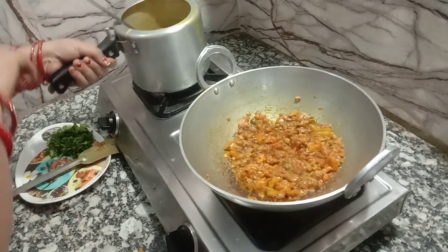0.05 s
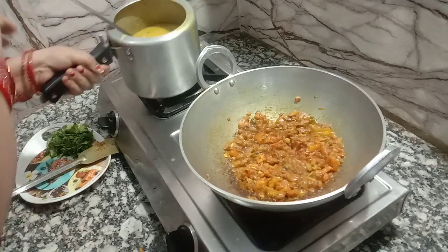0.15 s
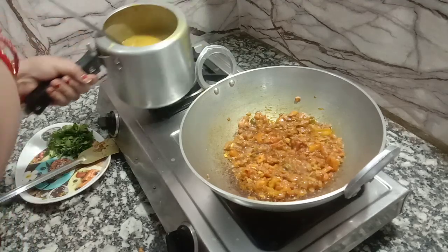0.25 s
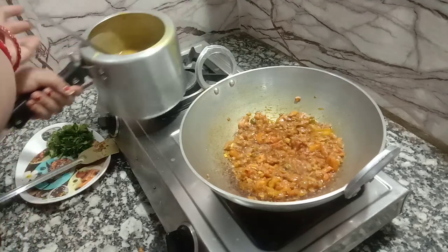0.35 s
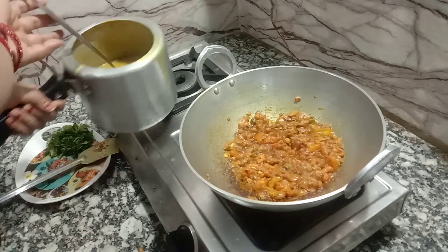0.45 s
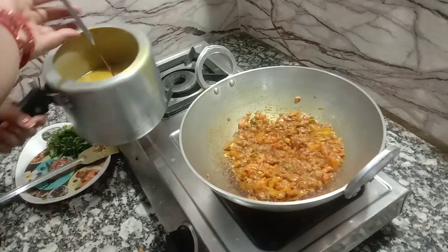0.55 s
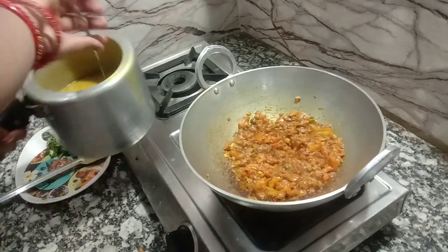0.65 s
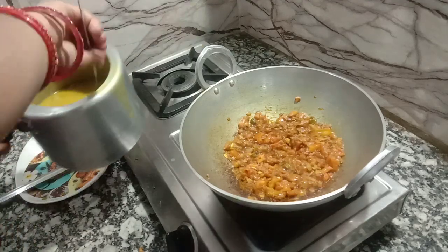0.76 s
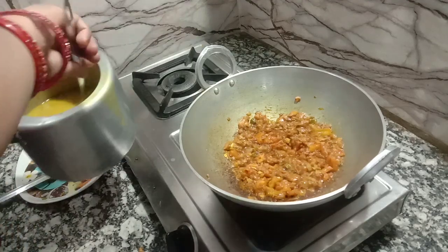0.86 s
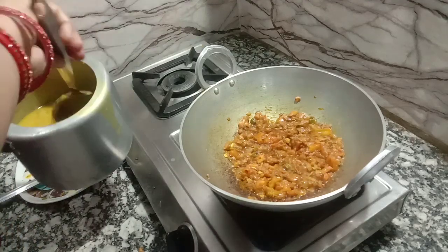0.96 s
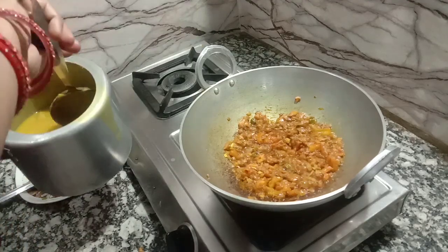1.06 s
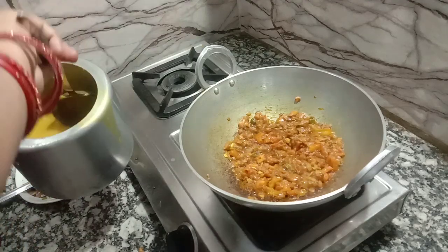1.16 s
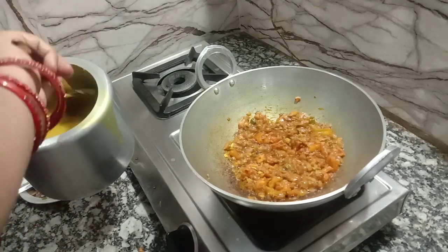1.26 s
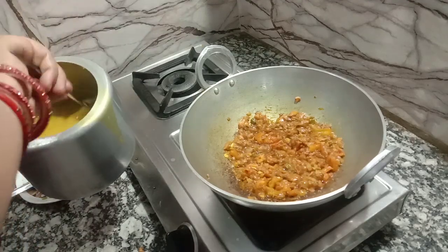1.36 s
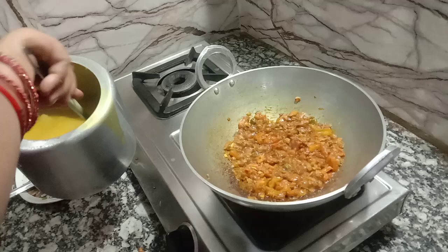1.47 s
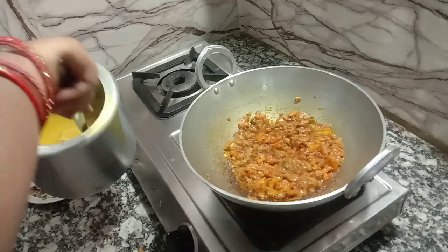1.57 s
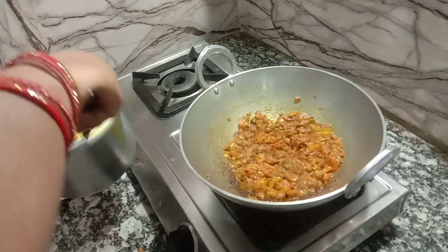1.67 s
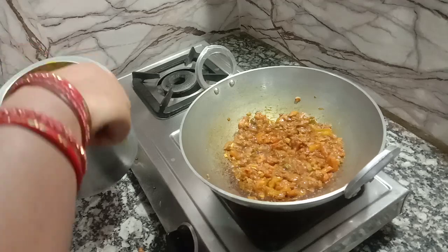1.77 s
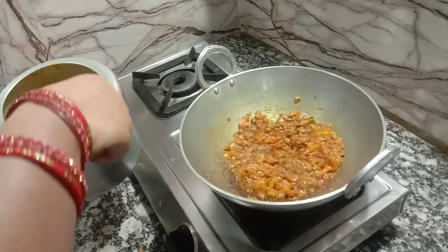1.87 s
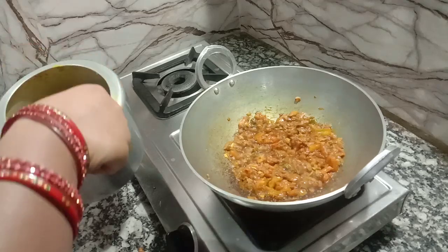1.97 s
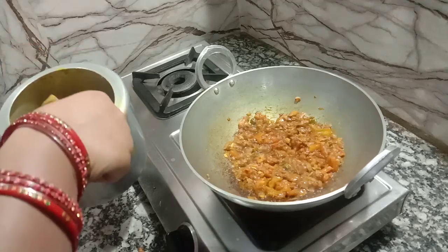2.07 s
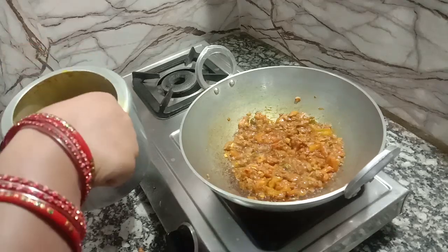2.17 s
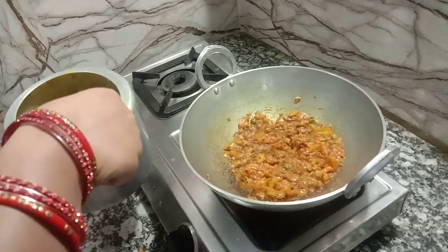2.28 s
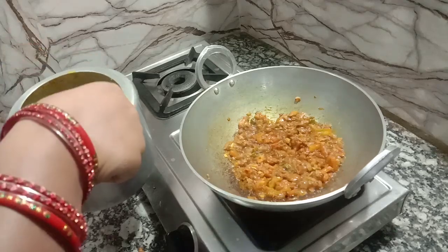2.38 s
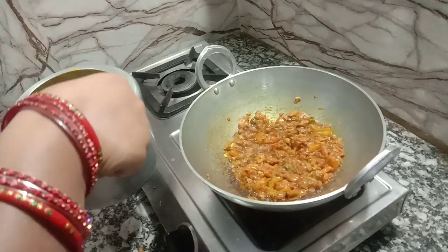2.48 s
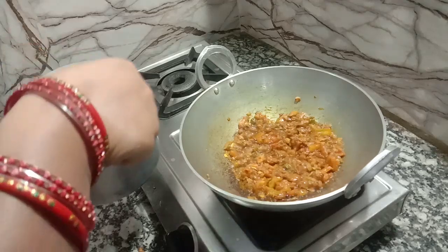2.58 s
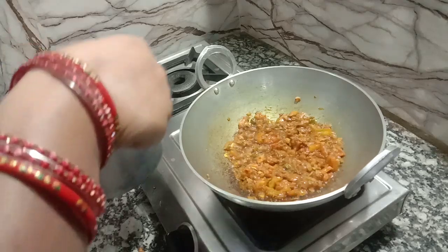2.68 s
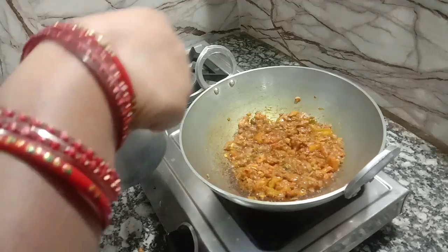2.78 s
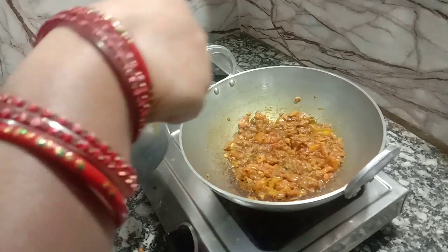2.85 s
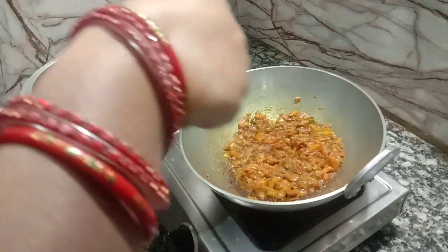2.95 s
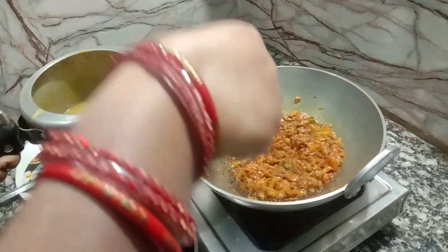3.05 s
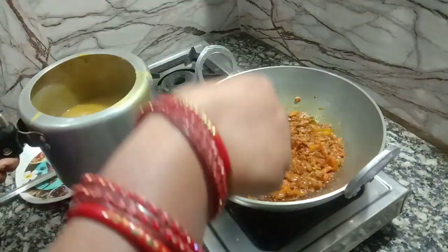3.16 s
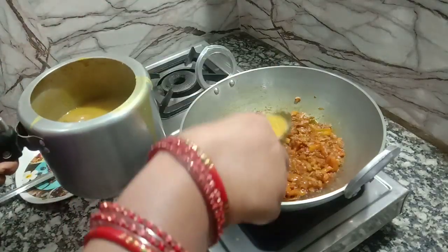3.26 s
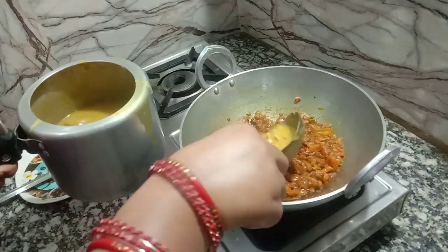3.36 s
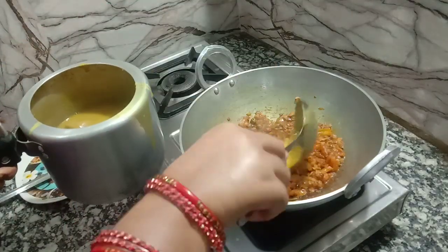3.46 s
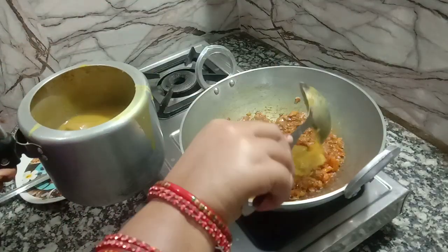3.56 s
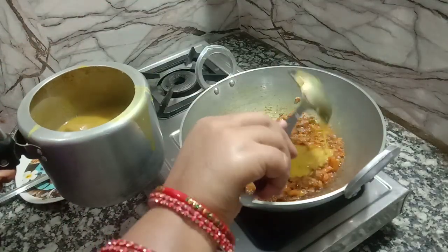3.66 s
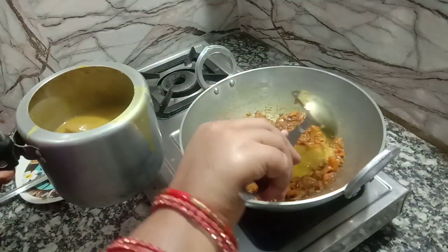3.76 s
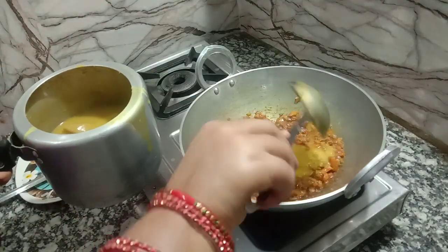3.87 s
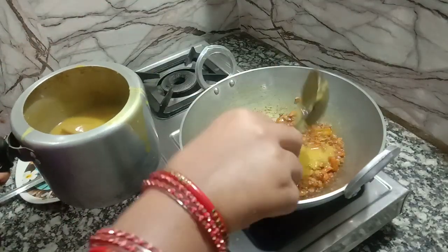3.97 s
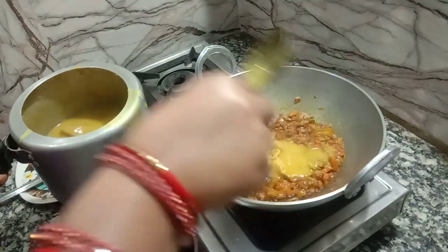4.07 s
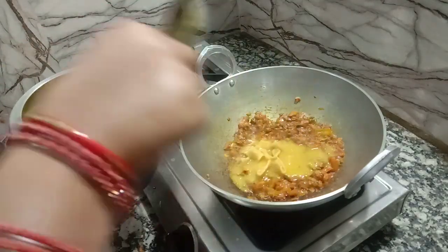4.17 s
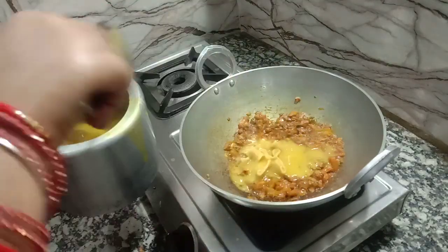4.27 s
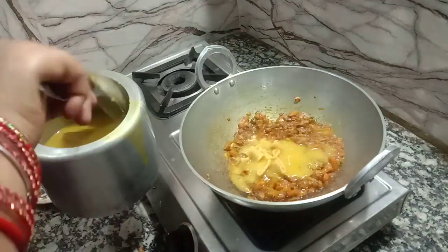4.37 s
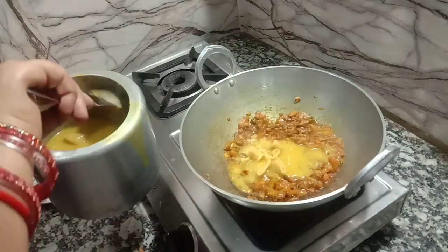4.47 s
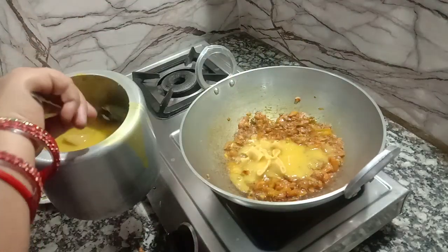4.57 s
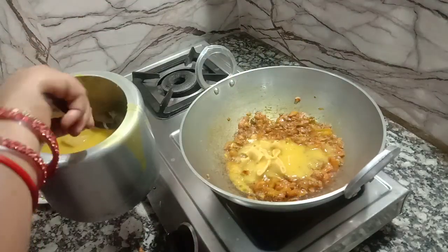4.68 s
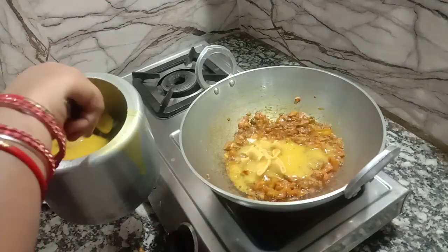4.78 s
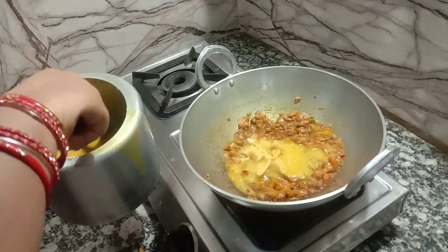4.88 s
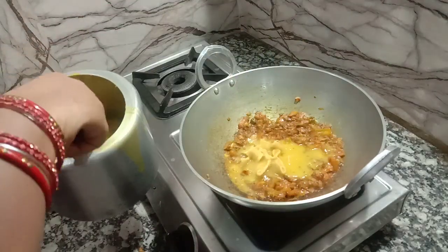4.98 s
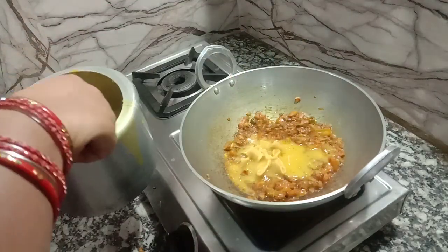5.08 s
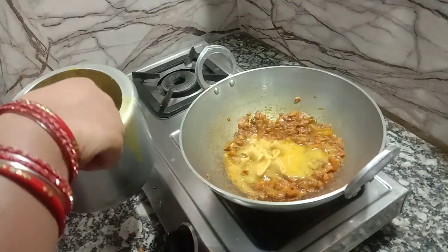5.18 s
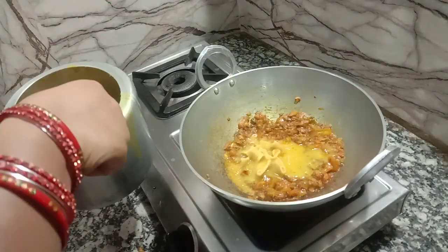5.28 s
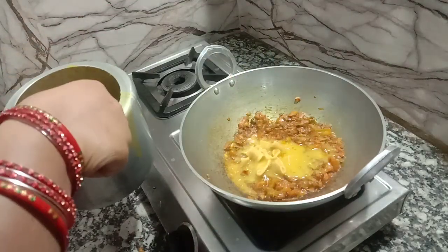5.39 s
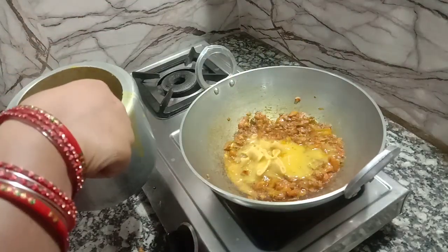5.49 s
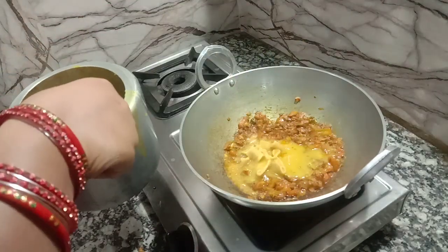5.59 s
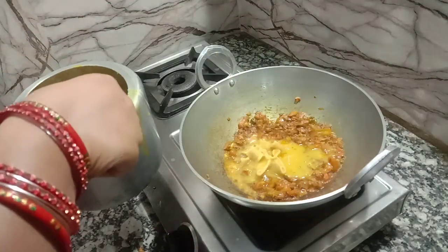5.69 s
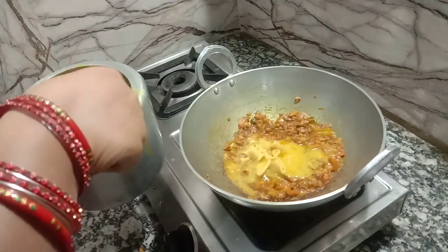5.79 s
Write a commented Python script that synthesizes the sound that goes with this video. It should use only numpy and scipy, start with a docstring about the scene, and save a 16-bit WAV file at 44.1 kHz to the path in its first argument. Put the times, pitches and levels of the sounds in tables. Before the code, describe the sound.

Thin, crisp sizzling runs throughout over a very faint gas flame and hum. It opens with a short rough metal drag and small oil ticks, followed by a cluster of short metallic ladle taps in a pot. After a calmer pause, poured stew makes the pan hiss brighter and bubble, with crackling spits, then a few more dull pot knocks. Near microphone, light room echo.

```python
"""In a small kitchen, spiced vegetables fry in oil in a thin metal pan: coloured bursts of random clicks.
The sizzle swells when a ladle of stew is poured in, and spits of oil snap and fizz in narrow bands.
A pot is dragged off the burner as a run of uneven slips; the ladle rubs and knocks inside it, ringing
its wall as a set of fading sines. Filtered noise makes the gas flame and a faint hum, short decaying
sines make dull bumps, and delays that feed back on themselves give the kitchen its echo."""
import sys
import numpy as np
from scipy import signal
from scipy.fft import rfft, irfft
from scipy.io import wavfile

SR = 44100
rng = np.random.default_rng(int(sys.argv[2]) if len(sys.argv) > 2 else 0)


def generate_wav(signal):
    """Clip the signal to [-1, 1] and save it as 16-bit WAV at the path in sys.argv[1]."""
    frames = np.transpose(np.atleast_2d(signal))
    scaled = np.clip(frames, -1, 1) * 32767
    pcm = np.round(scaled).astype(np.int16)
    wavfile.write(sys.argv[1], SR, pcm)


N = 257306

# how vigorously the pan fries, stepping up as the stew lands: (t/s, sizzle level/dB)
FRYING_LEVEL = [(0.0, -45), (0.2, -49.5), (0.5, -48), (1.0, -49.5), (1.45, -47.5), (2.6, -49.5),
                (3.03, -48.5), (3.07, -44), (3.49, -44.5), (3.6, -42.5), (3.92, -38), (4.14, -36),
                (4.19, -34), (4.9, -34.5), (5.3, -37), (5.54, -37.5), (5.67, -37.5), (5.83, -38.5)]
# tone of the sizzle: (f/Hz, relative level per Hz/dB)
SIZZLE_TONE = [(700, -34.5), (1500, -27), (2000, -27.5), (2400, -10), (3000, -8.5), (4200, -3.5),
               (5100, 1.5), (5800, -1.5), (6450, -1.5), (7200, -10), (8000, -18), (10500, -27),
               (14000, -52), (14700, -36), (15700, -63)]
# tone of the wet bubbling: (f/Hz, relative level per Hz/dB)
BUBBLING_TONE = [(100, -35.5), (250, -19.5), (400, -8), (550, -1), (900, -9.5), (1050, -8.5), (1350, -1),
                 (1900, -3), (2400, 3.5), (3200, -20)]
# pot dragged over the burner stand, hard and then lightly and dully:
# (start t/s, fade begins t/s, level before the extra bass/dB, extra bass share)
POT_DRAGS = [(0.0, 0.147, -44.5, 0.088), (.2, 0.62, -60, 2.4)]
# tone of the dragging: (f/Hz, relative level per Hz/dB)
DRAG_TONE = [(24, -26), (40, -28), (80, -10), (314, -6.5), (355, 3), (445, -3.5), (521, 2.5), (978, -4.5),
             (1070, -5), (1590, -11), (2600, -15), (3800, -10), (5720, -120)]
# tone of the gas flame: (f/Hz, relative level per Hz/dB)
FLAME_TONE = [(15, -45), (25, -28), (98, -13.5), (159, -14), (178, -18.5), (215, -18.5), (346, -10),
              (622, -4.5), (673, -3.5), (1100, -10.5), (1430, -20.5), (2420, -120)]
# faint hum: (f/Hz, width of each of two resonances in a row/Hz, level/dB)
HUM_TONES = [(49.66, 3.5, -90), (100, 1.1, -86)]
# oil spits: (t/s, snap peak level/dB, starting fizz level/dB, pitch f/Hz)
OIL_SPITS = [(0.322, -46, -63, 5500), (0.48, -32, -53, 8150), (.648, -40, -68, 6500),
             (0.71, -33, -58, 5440), (0.77, -40, -48, 4440), (1.173, -39, -43.5, 6700),
             (2.492, -36, -50, 5570), (2.803, -31.5, -50, 6240), (3.649, -34, -38, 5900),
             (3.789, -25, -39, 5500), (3.836, -37, -49, 8800), (3.925, -34, -35.5, 5700),
             (4.003, -24, -30, 5760), (4.091, -36, -57, 5100), (4.175, -22, -30.5, 5100),
             (4.405, -29, -35.5, 6500), (5.169, -34, -36, 6050), (5.683, -24, -34.5, 5700)]
# dull bumps through the counter: (t/s, level before softening/dB, f/Hz, time to fall 60 dB/s)
COUNTER_BUMPS = [(0.418, -47.5, 148, 0.028), (0.551, -53, 254, .08), (1.141, -57, 99, .1),
                 (4.049, -62, 100, 0.091)]
# ladle rubbing the pot wall, levels before the wall's response:
# (start t/s, end t/s, level/dB, pitch that rings most f/Hz, spread/octaves)
LADLE_RUBS = [(1.217, 1.262, -74.5, 655, 0.048), (1.222, 1.273, -82, 2280, 0.11),
              (1.316, 1.426, -74.5, 2200, 0.074), (1.329, 1.36, -84, 910, 0.098),
              (1.372, 1.393, -73, 4080, 0.05), (1.733, 1.83, -84, 910, 0.067),
              (3.734, 3.815, -88, 1180, 0.08), (4.43, 4.534, -85, 900, .08), (4.6, 4.7, -86.5, 934, 0.066)]
# ladle knocks, levels before the wall's response:
# (t/s, ring level/dB, pitch that rings most f/Hz, spread/octaves, ring length as a multiple of the
#  basic one, contact crack level/dB, crack pitch f/Hz, crack spread/octaves)
LADLE_KNOCKS = [(1.287, -50, 920, 0.15, 0.22, -43.5, 2010, 0.4),
                (1.428, -32, 672, 0.19, 0.52, -34.5, 3930, 0.88),
                (1.464, -46, 735, 0.11, .6, -42, 3900, 0.22),
                (1.503, -37.5, 694, 0.13, 0.27, -51, 2000, 0.34),
                (1.683, -42.5, 2420, 0.12, 0.48, -42.5, 3400, 0.83),
                (1.698, -42, 2620, 0.088, 0.46, -66, 2620, 0.22),
                (1.726, -52, 2470, 0.2, 0.72, -43, 1730, 0.24),
                (1.91, -43.5, 1240, 0.082, 0.54, -34.5, 1810, 1.24),
                (1.969, -50, 1230, 0.047, 0.99, -60, 2100, .25),
                (2.023, -54, 2090, .05, 0.39, -33.5, 2350, 0.25),
                (2.626, -53, 2410, 0.17, 0.35, -52, 2380, .3),
                (4.161, -38, 1830, 0.21, 1.06, -54, 1800, 0.26),
                (4.592, -42, 947, 0.048, 1.2, -52, 600, 0.57),
                (4.876, -31.5, 560, 0.18, 0.83, -35.5, 2280, 0.93),
                (5.024, -38, 760, 0.48, 0.17, -35.5, 3720, 0.2),
                (5.224, -55, 690, 0.21, 1.6, -36.5, 780, 0.48), (5.25, -58, 1820, .3, .4, -38, 1770, 0.25),
                (5.563, -53, 584, 0.26, 0.28, -42, 690, 0.24)]
# ways the pot wall rings with the ladle in it:
# (f/Hz, relative level/dB, basic ring length to fall 60 dB, scaled for each touch/s)
POT_MODES = [(280, -3, .06), (357, 4, 0.05), (404, -38, .1), (504.4, -1, 0.09), (585, 2.5, 0.11),
             (652, -13, 0.23), (694.3, -5, 0.25), (762, -10, 0.72), (861.5, 3, 0.51), (899, 4, 0.18),
             (1170, 1.5, 0.15), (1272, 6, 0.27), (1378, 8, 0.018), (1670, -14, 0.045), (1800, -3, 0.17),
             (2118, 3.5, 0.16), (2380, -17, 0.18), (2338, 6.5, 0.057), (2620, 1.5, 0.24), (2920, 2, 0.067),
             (3336, 9, 0.068), (3750, 5, 0.1), (4080, 7.5, 0.1), (4520, 7.5, .1), (5100, 12, 0.071),
             (5540, 6, .06), (6400, 12.5, 0.041)]

QUIET_DB = -48  # sizzle level at which the "when quiet" settings below hold
EDGE_DB, EDGE_FOLLOWS = 3.5, -0.11  # lift of the top bands when quiet; change in dB per dB of sizzle
WET_DB, WET_FOLLOWS = -64, 0.98  # bubbling level when quiet; change in dB per dB of sizzle
POPS_FOLLOWS = -0.7  # big bursts stand out less as the sizzle thickens: dB per dB of sizzle
TREBLE_HISS_HZ, TREBLE_HISS_DB = (14770, 16100), -73  # level at the weakest sizzle, before it flickers
DRAG_FADE_DB_PER_S, DRAG_BASS_HZ = 258, 222
FLAME_DB = -65  # around which the flame wavers
KITCHEN_T60_S, WALL_CUT_HZ, KITCHEN_DB = 0.5, 6400, -15  # time for low echoes to fall 60 dB
FIZZ_S, FIZZ_SWELL_S = 0.096, 0.0042  # fizz falls 30 dB in the first time, swells in the second
CLASH_DB, CLASH_T60_S, CLASH_TOP_HZ = -5.5, 0.18, 6500  # clash level is relative to the knock's crack
CUTOFF_HZ = 15720  # from here up, at least 70 dB down


def from_db(db):
    """Turn decibels into a plain multiplier."""
    return 10 ** (np.asarray(db) / 20)


def rms_one(x):
    """Scale a signal to an average strength (rms) of 1."""
    return x / np.sqrt(np.mean(x ** 2) + 1e-20)


def bandlike(order, hz, kind, x):
    """Keep one part of the pitch range with a Butterworth filter."""
    return signal.sosfilt(signal.butter(order, hz, kind, fs=SR, output="sos"), x)


def drift(rate_hz):
    """Slow wandering: noise smoothed twice by a one-pole low-pass; rms 1."""
    r = np.exp(-80 * np.pi * rate_hz / SR)  # made at 1/40 of the sample rate
    noise = rng.standard_normal(N // 40 + 2002)
    slow = signal.lfilter([1], [1, -2 * r, r * r], noise)[2000:]
    return np.interp(np.arange(N) / 40, np.arange(len(slow)), rms_one(slow))


def colour(x, tone):
    """Give a signal the tone of a table, with a filter that never sounds early; rms 1."""
    hz, db = np.transpose(tone)
    grid_hz = np.maximum(np.arange(2049) * SR / 4096, 1)
    cepstrum = irfft(np.interp(np.log(grid_hz), np.log(hz), db) * np.log(10) / 20)
    # folding the cepstrum forward makes the filter minimum-phase
    cepstrum[1:2048] *= 2
    cepstrum[2049:] = 0
    response = irfft(np.exp(rfft(cepstrum)))
    return rms_one(signal.fftconvolve(x, response)[:N])


def ring(clicks, hz, t60):
    """A resonance: a click of height 1 starts a fading sine of height 1."""
    r, w = from_db(-60 / (t60 * SR)), 2 * np.pi * hz / SR
    return signal.lfilter([0, np.sin(w)], [1, -2 * r * np.cos(w), r * r], clicks + 1e-18)


def grains(per_s, spread_db):
    """Random clicks, most small, a few large; rms 1."""
    sizes = from_db(spread_db * np.minimum(rng.exponential(1, N), 6)) * rng.choice([-1, 1], N)
    return rms_one(sizes * (rng.random(N) < per_s / SR))


def whistle(hz, width_hz):
    """A wavering tone: noise sent twice through one resonance; rms 1."""
    t60 = np.log(1000) / (np.pi * width_hz)
    return rms_one(ring(ring(rng.standard_normal(N), hz, t60), hz, t60))


def frying():
    """Steam bubbles burst thousands of times a second; each size class has its pitch band and patches."""
    sizzle_db = np.interp(np.arange(N) / SR, *np.transpose(FRYING_LEVEL))
    above_quiet_db = sizzle_db - QUIET_DB
    edge_db = EDGE_DB + EDGE_FOLLOWS * above_quiet_db
    wet_db = WET_DB + WET_FOLLOWS * above_quiet_db
    # a few big bursts span all bands
    pops = 0.4 * grains(300, spread_db=1.6) * from_db(POPS_FOLLOWS * above_quiet_db)
    bursts = [rfft(colour(grains(7000, spread_db=1.0) + pops, SIZZLE_TONE)) for _ in range(2)]
    centres = np.log([1200, 2000, 2800, 3700, 4700, 5700, 6900, 8500, 10500, 13000, 15500])
    log_hz = np.log(np.arange(1, N // 2 + 2) * SR / N)
    sizzle, together = 0, drift(16.0)
    for k, centre in enumerate(centres):
        # neighbouring bands overlap, and their powers add to 1
        share = np.interp(log_hz, centres, np.arange(len(centres)) == k)
        high = centre > np.log(7000)
        patch_db = 0.6 * together + (0.9 + 0.7 * high) * drift(18) + edge_db * high
        band = irfft(bursts[k % 2] * np.sqrt(share), N)
        sizzle = sizzle + band * from_db(patch_db)
    bubbling = colour(grains(3000, spread_db=2.0), BUBBLING_TONE) * from_db(1.54 * drift(36.0))
    # a narrow hiss at the very top grows only a little with the sizzle
    hiss = bandlike(4, TREBLE_HISS_HZ, "band", grains(4000, spread_db=2.5) + 2.5 * pops)
    hiss_db = TREBLE_HISS_DB + 0.27 * (sizzle_db - sizzle_db.min())
    hiss_db = hiss_db + 1.2 * together + 0.86 * drift(45.0)
    return (from_db(sizzle_db) * rms_one(sizzle) + from_db(wet_db) * bubbling
            + from_db(hiss_db) * rms_one(hiss))


def drag():
    """The pot base slips unevenly over cast iron; each drag holds, then fades."""
    t, out = np.arange(N) / SR, np.zeros(N)
    slips = colour(grains(1500, spread_db=0.0), DRAG_TONE)
    bass = bandlike(2, DRAG_BASS_HZ, "low", slips)
    for start, fade_start, db, bass_share in POT_DRAGS:
        level = from_db(db - DRAG_FADE_DB_PER_S * np.maximum(t - fade_start, 0))
        out += level * (t >= start) * (slips + bass_share * bass)
    return out


def background():
    """Flame roar is wavering coloured noise; the hum is noise squeezed into narrow resonances."""
    flame = from_db(FLAME_DB + 1.5 * drift(4.0)) * colour(rng.standard_normal(N), FLAME_TONE)
    hum = sum(from_db(db) * whistle(hz, width_hz) for hz, width_hz, db in HUM_TONES)
    return flame + hum


def kitchen(x):
    """Echoes between walls: eight feedback delays, each round weaker and duller."""
    out, dull = np.zeros(N), np.exp(-2 * np.pi * WALL_CUT_HZ / SR)
    for k, lag in enumerate((np.geomspace(0.0113, 0.0337, 8) * SR).astype(int)):
        loop, gain, state = x.copy(), from_db(-60 * lag / SR / KITCHEN_T60_S), [0.0]
        # one block is one trip round the delay
        for i in range(lag, N, lag):
            back, state = signal.lfilter([gain * (1 - dull)], [1, -dull], loop[i - lag:i], zi=state)
            loop[i:i + lag] += back[:N - i]
        out += (loop - x) * (-1) ** k
    return out


def spits():
    """A drop bursts with a snap, then fizzes out; both in a band set by its size."""
    out, t = np.zeros(N), np.arange(5000) / SR
    for s, snap_db, fizz_db, hz in OIL_SPITS:
        at = round(s * SR)
        snap, fizz = bandlike(3, [hz / 1.29, hz * 1.174], "band", [t == 0, rng.standard_normal(len(t))])
        fizz_level = from_db(fizz_db - 30 * t / FIZZ_S) * np.minimum(t / FIZZ_SWELL_S, 1)
        out[at:at + len(t)] += from_db(snap_db) * snap / snap.max() + rms_one(fizz) * fizz_level
    return out


def bumps():
    """Soft low thuds: each is one click into a low, quickly fading resonance."""
    at = np.arange(N)
    return sum(ring(from_db(db) * (at == round(s * SR)), hz, t60) for s, db, hz, t60 in COUNTER_BUMPS)


def closeness(hz, spot_hz, octaves):
    """How strongly a wall mode answers a touch that favours spot_hz."""
    return np.exp(-0.5 * (np.log2(hz / spot_hz) / np.maximum(octaves, 0.05)) ** 2)


def rubbing():
    """Dense small slips drive the wall modes while the ladle slides."""
    t, slips = np.arange(N) / SR, grains(600, spread_db=3.5)
    out = np.zeros(N)
    for hz, db, t60 in POT_MODES:
        drive = 0
        for start, end, level_db, spot_hz, spread in LADLE_RUBS:
            if abs(np.log2(hz / spot_hz)) < 3 * spread:  # skip modes too far off to answer
                slide = np.interp(t, [start - 0.01, start, end, end + 0.009], [0, 1, 1, 0])
                drive = drive + from_db(level_db + db) * closeness(hz, spot_hz, spread) * slide
        out += ring(drive * slips, hz, 0.35 * t60)
    return out


def knocks():
    """Each blow cracks and rings nearby wall modes, uneven as the ladle trembles; a noisy clash dies away."""
    out, t = np.zeros(N + SR), np.arange(SR // 3) / SR
    hz, db, t60 = np.transpose(POT_MODES)[:, :, None]
    damped_t60 = 0.02 + 12 / hz  # while in contact the modes die fast, high ones first
    tremble = np.lib.stride_tricks.sliding_window_view(drift(102.0), len(t))
    for s, ring_db, spot_hz, spread, ring_scale, crack_db, crack_hz, crack_spread in LADLE_KNOCKS:
        start, pick = rng.random((2, len(POT_MODES), 1))
        mode_tremble = tremble[(pick[:, 0] * len(tremble)).astype(int)]
        uneven = 1 + 0.5 * np.minimum(t / 0.0073, 1) * mode_tremble
        ring_fade = from_db(ring_db - 60 * t / (t60 * max(ring_scale, 0.05)))
        ringing = uneven * closeness(hz, spot_hz, spread) * ring_fade
        crack = closeness(hz, crack_hz, crack_spread) * from_db(crack_db - 60 * t / damped_t60)
        late = t - 0.002257 * start  # bending waves reach the air a little apart
        sines = np.sin(2 * np.pi * hz * late) * (late > 0)
        blow = np.sum(from_db(db) * (ringing + crack) * sines, axis=0)
        clash = bandlike(2, [crack_hz / 1.04, CLASH_TOP_HZ], "band", rng.standard_normal(len(t)))
        blow += from_db(crack_db + CLASH_DB - 60 * t / CLASH_T60_S) * clash
        # little sounds far below the modes that were struck
        floor_hz = min(spot_hz / 2 ** (0.62 + spread), crack_hz / 2 ** (1.27 * crack_spread))
        at = round(s * SR)
        out[at:at + len(t)] += bandlike(4, floor_hz, "high", blow)
    return out[:N]


def scene():
    """Mix the sources; the pan and the hits also feed the kitchen's echo."""
    # small bodies radiate little bass
    hits = bandlike(3, [250, 13000], "band", knocks() + rubbing() + spits())
    pan = frying()
    echo = from_db(KITCHEN_DB) * kitchen(0.8 * hits + 0.88 * pan)
    soft_bumps = signal.lfilter([0.05], [1, -0.95], bumps())
    return (hits + pan + echo + drag() + soft_bumps + background())[None]


def record(dry):
    """Cut the very top steeply."""
    return signal.sosfilt(signal.cheby2(26, 70, CUTOFF_HZ, fs=SR, output="sos"), dry)


dry = scene()
out = record(dry)
generate_wav(out)
```